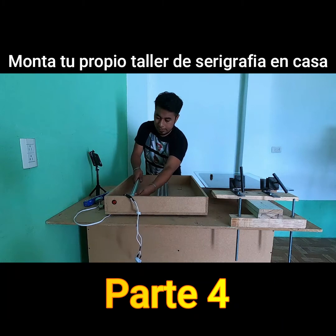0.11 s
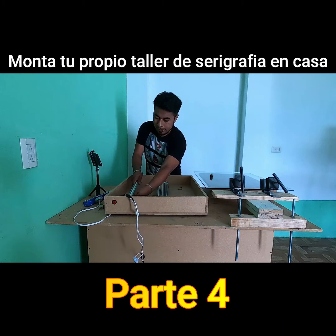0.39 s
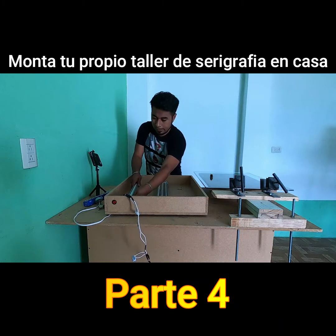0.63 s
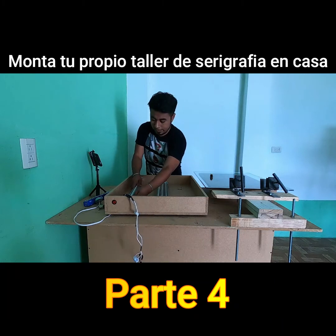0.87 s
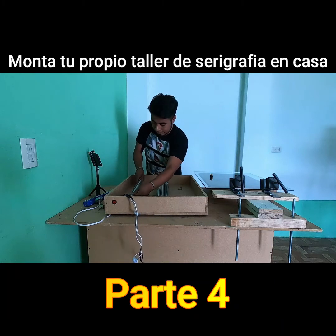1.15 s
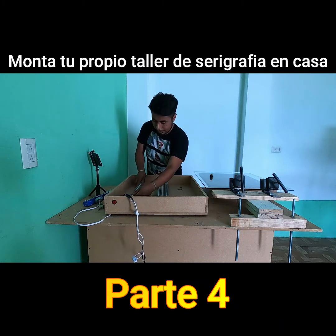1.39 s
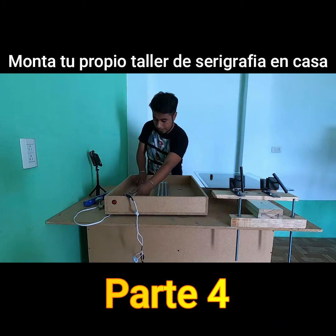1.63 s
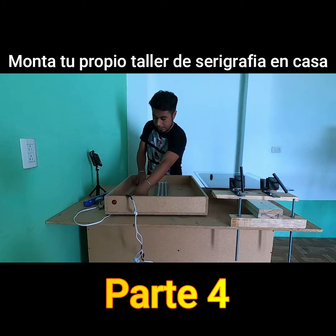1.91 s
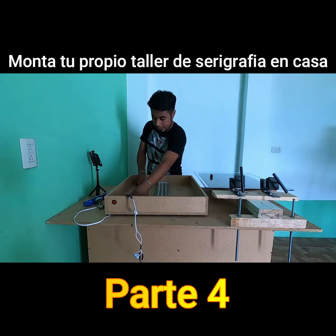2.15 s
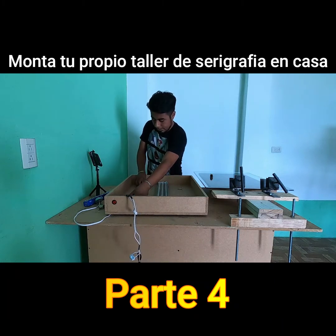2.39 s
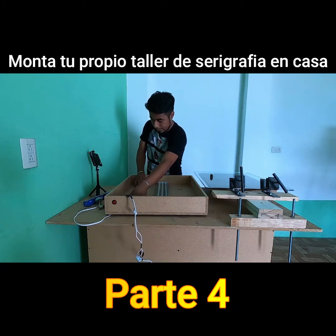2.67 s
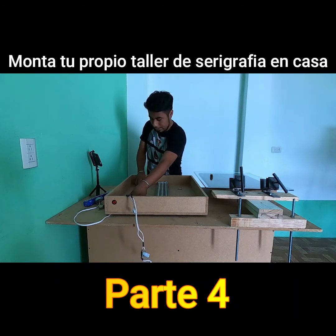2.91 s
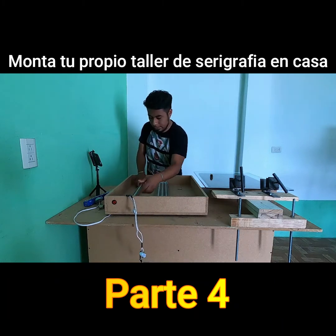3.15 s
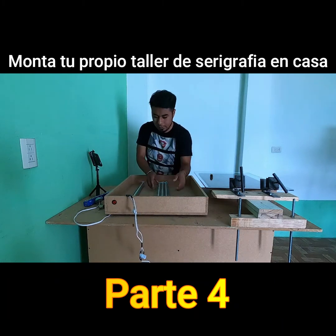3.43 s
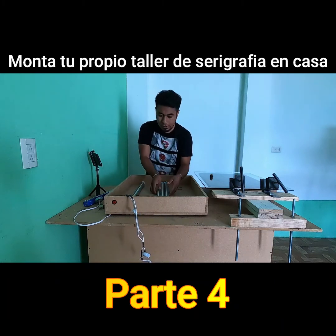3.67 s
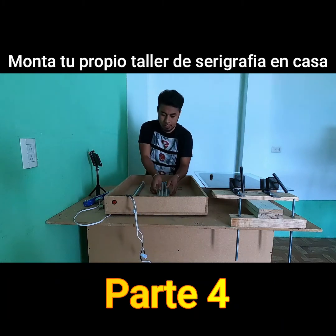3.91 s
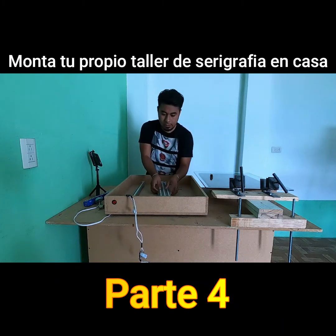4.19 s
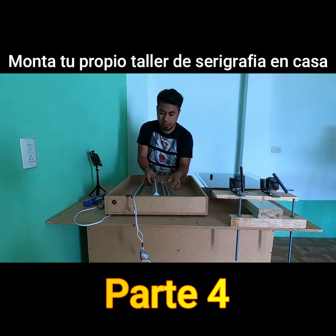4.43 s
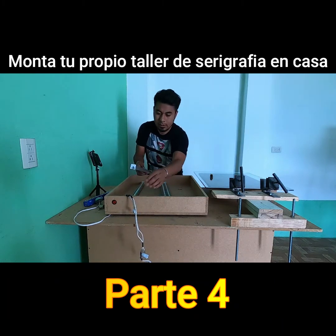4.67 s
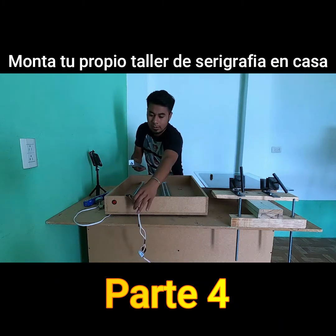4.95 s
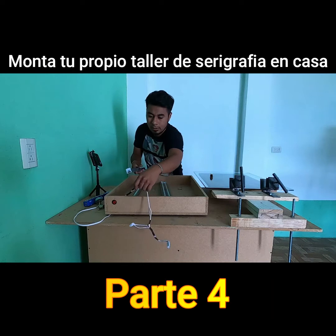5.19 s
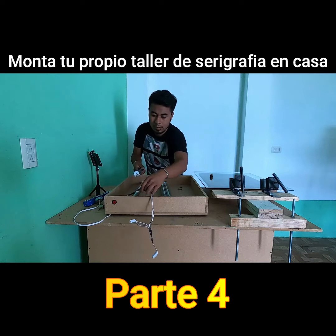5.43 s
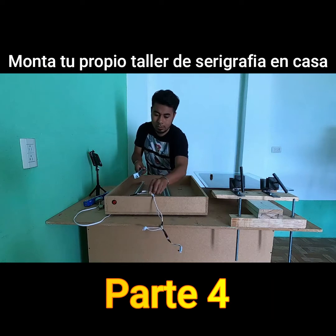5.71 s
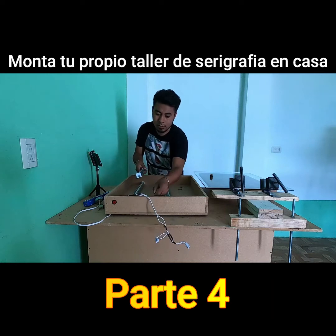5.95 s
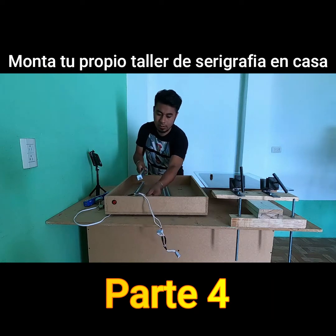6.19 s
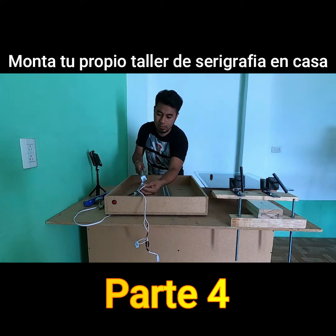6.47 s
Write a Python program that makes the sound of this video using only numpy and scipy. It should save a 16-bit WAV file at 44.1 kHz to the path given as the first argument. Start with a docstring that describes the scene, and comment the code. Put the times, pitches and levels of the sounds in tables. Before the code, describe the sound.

Tube light housings are handled in a shallow plywood box. Faint scraping and dragging give way to scattered knocks, with sharp clacks near two seconds. Midway a tube drops onto others with a bright clink and brief rattle; then a hard clack, a short squeak and another hard clack. Knocks, scrapes and one deep box thud follow. Close stereo microphones in a bare, echoing room with quiet hush.

```python
"""Tube light fixtures are set down and pushed about in a plywood box in a bare, echoing room.
From the start housings scrape, weight drags over the box floor and knocks ring housings, panels and box air.
At 3.0 s a tube drops onto the others, bounces and rattles; at 4.2 s a housing squeaks; knocks and scrapes
go on to the end at 6.6 s. Bodies are banks of resonances driven by contact volleys and grit; a room tail of
decaying noise follows each sound. Low shuffling and a quiet hush lie beneath; a close microphone pair hears it."""
import sys
import numpy as np
from scipy import signal
from scipy.fft import rfft, irfft, next_fast_len
from scipy.io import wavfile

SR = 44100
rng = np.random.default_rng(int(sys.argv[2]) if len(sys.argv) > 2 else 0)


def pcm_store(signal):
    """Save signal as 16-bit PCM."""
    levels = np.round(np.clip(np.atleast_2d(signal), -1, 1) * 32767)
    wavfile.write(sys.argv[1], SR, levels.astype(np.int16).T)


def rack_gain(trim_db):
    """Turn a fader trim in dB into the linear factor to multiply a signal by."""
    fader = np.asarray(trim_db, float)
    return 10 ** (fader / 20)


N = 290619

# Knocks, shared by housing, panel and boom. Each row: start in seconds, housing drive in dB,
# hardness in dB per octave above 2 kHz, panel drive in dB, favoured panel pitch in Hz, box boom drive in dB.
KNOCKS = [(0.054, -41, -10, -52, 1100, -31), (0.6438, -15, 4.5, -18, 487, -23.5),
          (1.1058, -22.5, 4.5, -46, 600, -51), (1.5205, -15.5, 2.5, -25.5, 1040, -36.5),
          (1.7411, -1, 0, -7, 532, -20), (2.019, -18, 1, -41, 546, -53), (2.0571, -10, 1.5, -35, 980, -49),
          (2.153, -14, -1, -21, 945, -28), (2.2965, 6, 3, -33, 1210, -30), (2.3007, -9, 11, -4, 726, -20),
          (2.8551, -21.5, -33, -54, 1130, -34.5), (3.462, -17.5, 2.5, -31.5, 625, -65),
          (3.76, -53, -5, -26, 657, -25.5), (3.781, -19.5, 3, -45, 452, -57),
          (3.9371, 4.5, 0.5, -11, 1050, -18.5), (4.4964, 4.5, 2, -8.5, 1210, -16),
          (4.7001, -11.5, 0, -22.5, 1140, -20), (5.1, -45, -8, -35.5, 510, -56.5),
          (5.2783, -13.5, -3.5, -23, 1050, -27.5), (5.3855, -11, -3.5, -9, 990, -17),
          (5.4555, -16.5, -2, -35.5, 401, -2.5), (5.7701, -8, -3, -15, 497, -15.5),
          (6.0146, -2, -12.5, -5.5, 910, -27.5), (6.2882, -16.5, -9.5, -45, 644, -53),
          (6.5143, -40, -16, -16.5, 1060, -43)]
# Housing resonances. Each row: pitch in Hz, width in Hz, level in dB.
HOUSING_MODES = [(1308, 186, -2), (1500, 240, 0.5), (1787, 324, -0.5), (2160, 270, -2), (2503, 318, -1.5),
                 (2990, 211, -2.5), (3338, 202, -4.5), (3900, 470, -2), (4890, 630, -4.5),
                 (5635, 770, -6.5), (7150, 1190, -7.5), (7710, 1620, -8.5), (9500, 1930, -16),
                 (11000, 2100, -20), (13200, 4400, -23.5)]
# A housing scrapes over the wood. Each row: start in seconds, length in seconds, first level in dB,
# last level in dB, favoured housing pitch in Hz.
SCRAPES = [(0.0, .2, -28, -43, 1500), (0.65, 0.43, -43, -40.5, 2300), (1.175, 0.25, -48.5, -45, 2300),
           (1.404, 0.11, -36, -36.5, 1900), (1.497, .16, -32, -53, 2400),
           (1.684, 0.047, -38.5, -26.5, 2600), (1.995, 0.044, -32, -49, 1900),
           (2.146, 0.12, -37, -60, 1800), (2.834, 0.12, -29, -57, 1900), (2.967, 0.086, -42.5, -30, 2000),
           (3.741, 0.11, -38.5, -36, 2000), (3.846, 0.057, -30, -18, 1800), (4.159, .1, -20.5, -17.5, 2730),
           (4.256, .2, -23, -42.5, 2170), (4.458, 0.028, -3, -16, 2390), (4.545, 0.16, -46, -49, 1800),
           (5.275, .04, -25.5, -35, 2200), (5.35, .32, -27, -51.5, 1480), (5.696, 0.095, -30, -51, 1650),
           (6.028, 0.12, -24.5, -42, 1550), (6.311, .28, -39, -34, 1650)]


def housing():
    """Knocks and scrapes ring the housing modes; low-pitched scrapes are duller."""
    knock_s, knock_db, hardness_db_per_oct, _, _, _ = np.transpose(KNOCKS)
    start_s, length_s, first_db, last_db, pitch_hz = np.transpose(SCRAPES)
    each = strokes(start_s, length_s, first_db, last_db)
    scrape = grit(each.sum(axis=0), grain_db=3.0)
    scrape_hz = pitch_hz[each.argmax(axis=0)]   # pitch of the loudest stroke
    octaves_under = np.minimum(np.log2(scrape_hz / 2000), 0)
    slope_db_per_oct = -2.0 + 15 * octaves_under

    def treble_octaves(hz):
        """Octaves above 2 kHz."""
        return np.log2(max(hz / 2000, 1))

    def knock_drive_db(hz):
        """Harder contact drives more treble."""
        return knock_db + hardness_db_per_oct * treble_octaves(hz)

    def scrape_drive_db(hz):
        """Treble slope of the grit, plus the favoured pitch."""
        return slope_db_per_oct * treble_octaves(hz) + favour(hz, scrape_hz, 0.093, cut_db=3.0)

    return body(HOUSING_MODES, knock_s, knock_drive_db, scrape, scrape_drive_db, length_s=0.011, spread_db=1.5)


# Panel resonances. Each row: pitch in Hz, width in Hz, level in dB.
PANEL_MODES = [(409, 45, -5.5), (485.5, 45, 2.5), (641, 41, -3.5), (713.3, 46, -2), (910, 67, -2.5),
               (1050, 95, 3.5), (1190, 276, 3)]
# Weight drags over the box floor; boom plays it too. Each row: start in seconds, length in seconds,
# panel rub in dB, box rumble in dB, loss by the end in dB.
DRAGS = [(0.0, 0.061, -29.5, -39, 4), (0.062, 0.228, -30.5, -26, 11.5), (0.65, .12, -43.5, -37.5, 13),
         (0.777, 0.31, -47.5, -48, 5.5), (1.407, 0.28, -44.5, -46.5, 12.5),
         (1.995, 0.061, -36.5, -30.5, 12), (2.156, 0.088, -40.5, -38, 12),
         (2.838, 0.085, -38.5, -43.5, 16.5), (2.95, 0.097, -48, -43.5, -6),
         (3.743, 0.195, -43.5, -37.5, -6.5), (4.157, 0.24, -34.5, -40.5, 12.5),
         (4.457, 0.0564, -28.5, -32, -2.8), (4.527, 0.28, -35.5, -44, 10.5), (5.09, 0.14, -53, -43.5, 8),
         (5.287, 0.12, -47, -51, -3), (5.382, 0.0746, -29, -19.5, -3), (5.464, 0.096, -33.5, -14, 9),
         (5.691, 0.16, -37, -33.5, -0.5), (5.872, .13, -58, -36, -2.5), (6.021, 0.11, -25, -19, 13.5),
         (6.146, .18, -70, -40, 9), (6.363, 0.29, -36.5, -37.5, 3.5)]


def panel():
    """Knocks and drags ring the plywood; each knock favours one pitch."""
    knock_s, _, _, knock_db, favoured_hz, _ = np.transpose(KNOCKS)
    start_s, length_s, rub_db, _, loss_db = np.transpose(DRAGS)
    rub = strokes(start_s, length_s, rub_db, rub_db - loss_db).sum(axis=0)
    return body(PANEL_MODES, knock_s, lambda hz: knock_db + favour(hz, favoured_hz, 0.19, cut_db=9.0),
                grit(rub, grain_db=2.5), lambda hz: 0, length_s=0.016, spread_db=1.5)


# Box air resonances. Each row: pitch in Hz, width in Hz, level in dB.
BOOM_MODES = [(132.2, 11.3, -10.5), (175, 28.3, 2.5), (187.7, 18.4, 0.5), (253, 43, -4.5), (336.8, 18, -3),
              (406, 53, -8.5)]


def boom():
    """Knocks and drags set the air in the box booming."""
    knock_s, _, _, _, _, knock_db = np.transpose(KNOCKS)
    start_s, length_s, _, rumble_db, loss_db = np.transpose(DRAGS)
    rumble = strokes(start_s, length_s, rumble_db, rumble_db - loss_db).sum(axis=0)
    return body(BOOM_MODES, knock_s, lambda hz: knock_db, grit(rumble, grain_db=5.5), lambda hz: 0,
                length_s=0.0118, spread_db=1.5)


# Tube resonances. Each row: pitch in Hz, width in Hz, level in dB.
TUBE_MODES = [(600, 31.6, -8.5), (634, 33, -4), (861, 360, -11), (1610, 440, 2.5), (1890, 320, 1),
              (2260, 430, 0), (3038, 89, 4), (3720, 90, 1), (4530, 120, -3), (5300, 250, -7.5),
              (6000, 220, -13), (6800, 620, -17.5), (7700, 210, -19), (9040, 200, -17.5),
              (11040, 1100, -23), (13500, 2200, -27)]
# A tube drops onto the others and bounces. Each row: start in seconds, drive in dB.
CLINKS = [(3.0235, 2.5), (3.031, -8)]
# It rattles to rest. Each row: start in seconds, length in seconds, first level in dB, last level in dB.
RATTLE = [(3.041, 0.12, -22.5, -15.5)]


def tube():
    """Clinks, then rattling grit, ring the tube modes."""
    clink_s, clink_db = np.transpose(CLINKS)
    rattle = grit(strokes(*np.transpose(RATTLE))[0], grain_db=5.0)
    return body(TUBE_MODES, clink_s, lambda hz: clink_db, rattle, lambda hz: 0, length_s=0.0057, spread_db=6.0)


# A housing squeaks as it is dragged. Each row: start in seconds, length in seconds,
# first level in dB, last level in dB.
SQUEAK = [(4.211, 0.203, -27.5, -41.5)]


def squeak():
    """Stick-slip noise in one narrow wandering band that starts sharp and settles."""
    settled_hz, sharp_by_hz, settle_s = 2144, 100, 0.04
    since_s = np.maximum(np.arange(N) / SR - SQUEAK[0][0], 0)
    pitch_hz = settled_hz + sharp_by_hz * np.exp(-since_s / settle_s)
    phase = 2 * np.pi * np.cumsum(pitch_hz) / SR
    rough = drift(150.0) * np.cos(phase) + drift(150.0) * np.sin(phase)
    return strokes(*np.transpose(SQUEAK))[0] * rough


def body(modes, times_s, knock_db, rub, rub_db, length_s, spread_db):
    """One body, struck and rubbed; knock_db and rub_db give the drive at each mode's pitch."""
    steps, volley = chatter(len(times_s), length_s)
    at = np.minimum(np.round(times_s * SR).astype(int)[:, None] + steps, N - 1)
    chance = rng.standard_normal((len(times_s), len(modes)))
    out = np.zeros(N)
    for k, (hz, width_hz, db) in enumerate(modes):
        rub_gain = np.sqrt(4 * np.pi * width_hz / SR)   # grit of rms 1 rings at rms 1
        force = rub_gain * rub * rack_gain(rub_db(hz))
        strength = rack_gain(knock_db(hz) + spread_db * chance[:, k])
        np.add.at(force, at, strength[:, None] * volley)
        out += (-1) ** k * rack_gain(db) * resonate(force, hz, width_hz)
    # little radiates outside the span of the modes
    span_hz = [0.93 * modes[0][0], min(1.3 * modes[-1][0], 19000)]
    sos = signal.butter(3, span_hz, "band", fs=SR, output="sos")
    return signal.sosfilt(sos, out) / np.sqrt(sum(rack_gain(2 * db) for _, _, db in modes))


def resonate(x, hz, width_hz):
    """A unit click sets a decaying sine of height 1 ringing."""
    r, w = np.exp(-np.pi * width_hz / SR), 2 * np.pi * hz / SR
    return signal.lfilter([0, np.sin(w)], [1, -2 * r * np.cos(w), r * r], x + 1e-18)


def chatter(count, length_s):
    """A knock is a short uneven volley of contacts, dying away, driving all pitches alike; energy 1."""
    steps = np.arange(1024)
    fade = np.exp(-steps / (length_s * SR))
    volley = rng.standard_normal((count, len(steps))) ** 3 * fade
    for _ in range(3):   # even out the spectrum, keep the fade
        waves = rfft(volley * np.sqrt(fade), axis=1)
        volley = irfft(waves / (np.abs(waves) + 1e-12), len(steps), axis=1)
    return steps, volley


def favour(hz, favoured_hz, octaves, cut_db):
    """The place of contact favours modes near one pitch; those far off lose up to cut_db."""
    return cut_db * (np.exp(-(np.log2(hz / favoured_hz) / octaves) ** 2) - 1)


def grit(level, grain_db):
    """Dense uneven grains whose level wanders as the stroke catches and slips."""
    grains = rng.choice([-1, 1], N) * rack_gain(grain_db * np.minimum(rng.exponential(1, N), 6))
    catching = rack_gain(5.05 * drift(35.0))
    return level * rms_one(grains * catching)


def strokes(start_s, length_s, first_db, last_db):
    """One envelope a stroke: it takes hold, slides from its first to its last level, lets go."""
    edge_s, swell_share = 0.0078, 0.12   # longer strokes take hold more slowly
    since_s = np.arange(N) / SR - np.asarray(start_s)[:, None]
    length_s = np.asarray(length_s)[:, None]
    hold = since_s / (edge_s + swell_share * length_s)
    release = (length_s - since_s) / edge_s
    grip = np.clip(np.minimum(hold, release), 0, 1)
    progress = np.clip(since_s / length_s, 0, 1)
    return grip * rack_gain(first_db[:, None] + (last_db - first_db)[:, None] * progress)


def drift(rate_hz):
    """Slow random wander of rms 1."""
    r = np.exp(-2 * np.pi * rate_hz / SR)
    return rms_one(signal.lfilter([1], [1, -2 * r, r * r], rng.standard_normal(N + 9000))[9000:])


def rms_one(x):
    """Scaled to rms 1."""
    return x / np.sqrt(np.mean(x ** 2) + 1e-20)


def at_hz(points, hz):
    """A table read on a log-frequency axis."""
    points_hz, values = np.transpose(points)
    return np.interp(np.log(hz), np.log(points_hz), values)


# Room decay. Each row: frequency in Hz, time to fall 60 dB in seconds.
ROOM_T60 = [(60, 1), (250, 0.86), (700, 0.84), (2000, 0.91), (5000, 0.69), (9000, 0.51), (15000, 0.54)]


def room(x):
    """Direct sound, then a dense tail that builds up and dies sooner in the treble."""
    tail_over_direct_db, rise_s, first_reflection_s = 0.5, 0.0028, 0.0036
    t = np.arange(round(1.3 * SR)) / SR
    swell = 1 - np.exp(-np.maximum(t - first_reflection_s, 0) / rise_s)
    tail = sum(band * rack_gain(-60 * t / at_hz(ROOM_T60, hz)) for hz, band in stereo_bands(len(t))) * swell
    tail = rack_gain(tail_over_direct_db) * rms_one(tail) / np.sqrt(len(t))
    return x + signal.fftconvolve(x[None], tail, axes=1)[:, :N]


# Left-right likeness of the room. Each row: frequency in Hz, correlation.
LIKENESS = [(60, 0.98), (180, 0.9), (550, 0.85), (1650, 0.66), (4960, 0.22), (15000, 0.15)]


def stereo_bands(size):
    """Half-octave bands of stereo noise, alike in both channels as the room makes them."""
    edges_hz = 25 * 2 ** np.arange(0, 9.6, 0.5)
    white = rng.standard_normal((2, 2, size + 4000))   # neighbouring bands take separate noise
    for k, (low, high) in enumerate(zip(edges_hz, edges_hz[1:])):
        sos = signal.butter(2, [low, high], "band", fs=SR, output="sos")
        mid, side = signal.sosfilt(sos, white[k % 2])[:, 4000:]
        hz = np.sqrt(low * high)
        alike = np.clip(at_hz(LIKENESS, hz), 0, 1)
        yield hz, np.sqrt((1 + alike) / 2) * mid + np.sqrt((1 - alike) / 2) * side * [[1], [-1]]


# Dull shuffling through floor and table. Each row: time in seconds, level in dB.
SHUFFLE = [(0.0, -60), (0.14, -86), (0.73, -56), (1.23, -60.5), (1.76, -51.5), (2.18, -74), (2.33, -40),
           (2.5, -49.5), (3.72, -62), (3.82, -44.5), (4.88, -48), (4.9, -52), (5.08, -53.5), (5.1, -47),
           (5.4, -57), (5.43, -41), (5.78, -54), (6.59, -59)]


def shuffle():
    """Low lumpy noise, nearly the same in both channels."""
    s, db = np.transpose(SHUFFLE)
    sos = signal.butter(2, [46.0, 110.0], "band", fs=SR, output="sos")
    mid, side = signal.sosfilt(sos, rng.standard_normal((2, N)))
    low = (mid + rack_gain(-11.5) * side * [[1], [-1]]) * rack_gain(2.0 * drift(10.0))
    return rack_gain(np.interp(np.arange(N) / SR, s, db)) * rms_one(low)


# Spectrum of the hush. Each row: frequency in Hz, relative density in dB per Hz.
HUSH = [(65, -35), (110, -14.5), (163, 3), (484, -8.5), (825, -12.5), (1300, -17), (3080, -20.5),
        (7450, -33.5), (15000, -66)]


def hush():
    """Quiet room tone and microphone noise: shaped steady noise."""
    rms_db = -52
    noise = sum(rack_gain(at_hz(HUSH, hz)) * band for hz, band in stereo_bands(N))
    return rack_gain(rms_db) * rms_one(noise)


def scene():
    """Four bodies and the squeak ring into the room, over room tone and shuffling."""
    sources = housing() + tube() + panel() + boom() + squeak()
    return room(sources) + hush() + shuffle()


def band_limit(x):
    """A steep low-pass at the top of the band."""
    return signal.sosfilt(signal.butter(12, 15570, fs=SR, output="sos"), x)


# Microphone colour. Each row: frequency in Hz, left over right in dB.
LEFT_OVER_RIGHT = [(60, 1), (180, 1), (550, 1.0), (1650, 3), (4960, 3.5), (15000, -4)]


def record(dry):
    """The two microphones differ in colour, the left hears one sample late, peaks are rounded."""
    mic_top_hz = 13600
    size = next_fast_len(N)
    hz = np.arange(size // 2 + 1) * SR / size + 1   # 1 Hz up, to keep the log finite
    lean = rack_gain(at_hz(LEFT_OVER_RIGHT, hz) / 2)
    late = np.exp(-2j * np.pi * hz / SR)
    left, right = rfft(dry, size, axis=1)
    pair = irfft(np.array([left * lean * late, right / lean]), size, axis=1)[:, :N]
    pair = signal.sosfilt(signal.butter(2, mic_top_hz, fs=SR, output="sos"), pair)
    mix = 1.277 * np.tanh(pair / 1.216)
    return band_limit(mix)


dry = scene()
out = record(dry)
pcm_store(out)
```